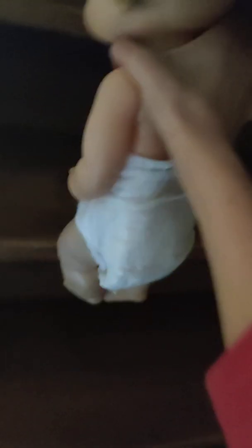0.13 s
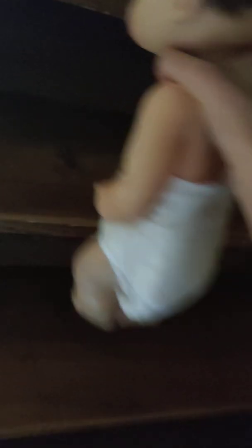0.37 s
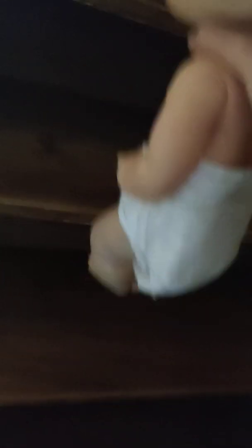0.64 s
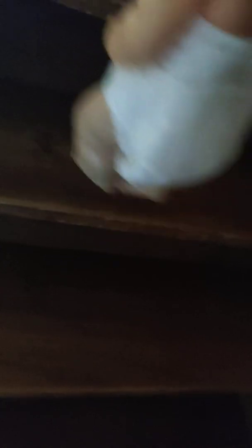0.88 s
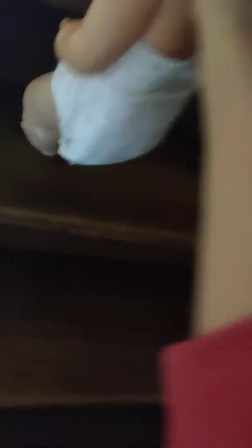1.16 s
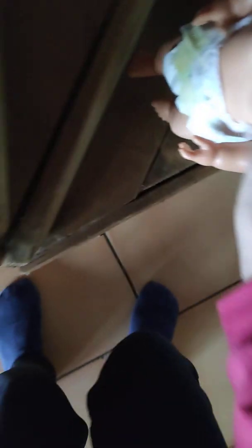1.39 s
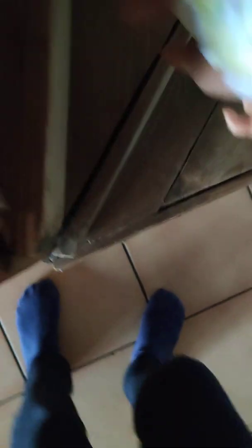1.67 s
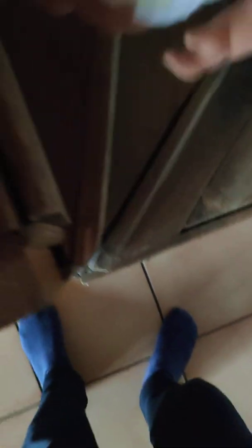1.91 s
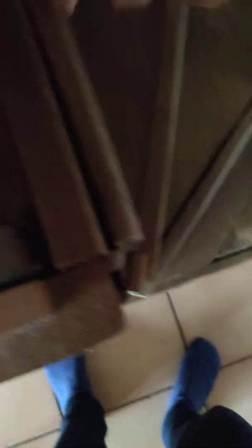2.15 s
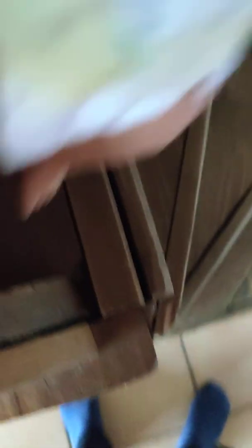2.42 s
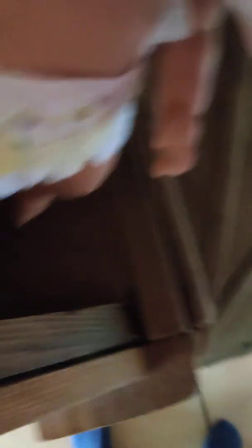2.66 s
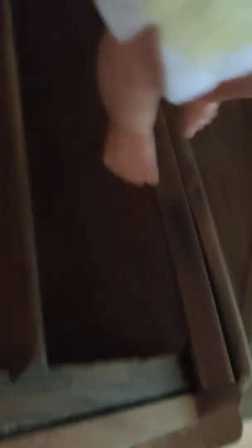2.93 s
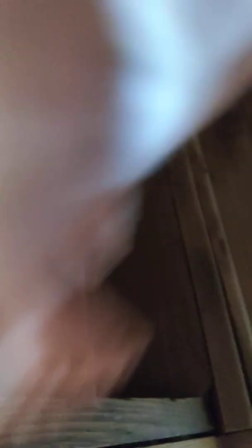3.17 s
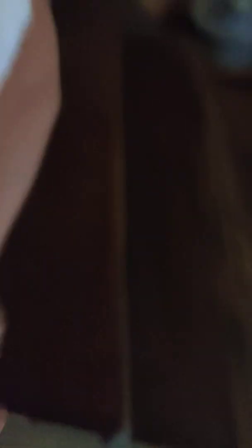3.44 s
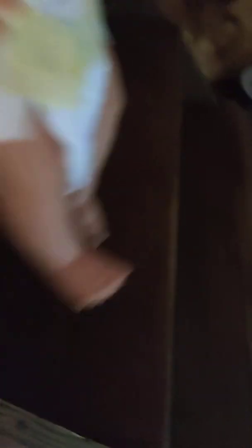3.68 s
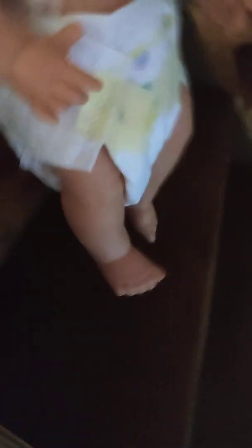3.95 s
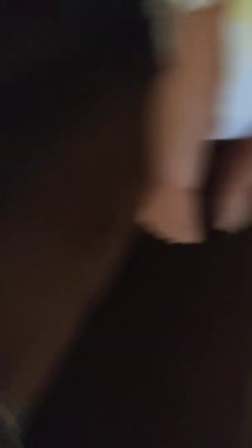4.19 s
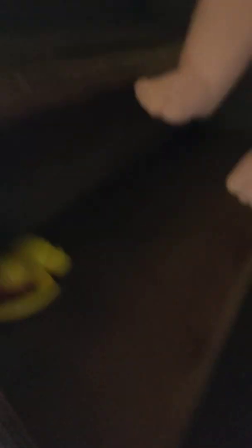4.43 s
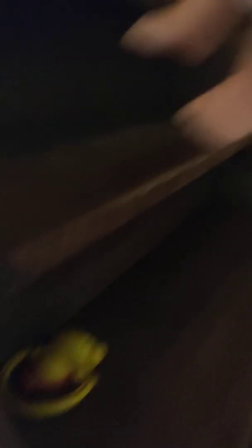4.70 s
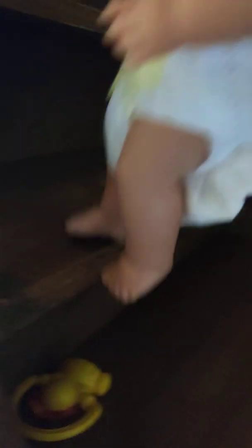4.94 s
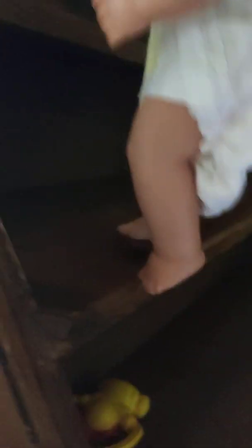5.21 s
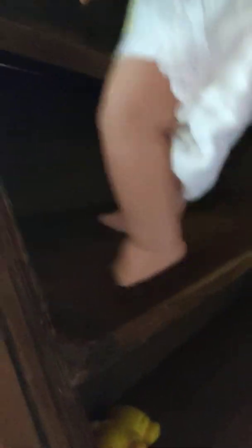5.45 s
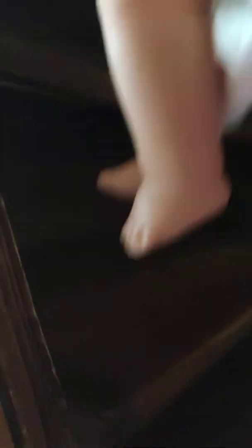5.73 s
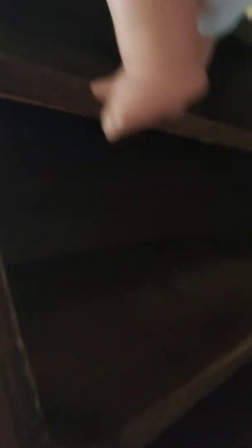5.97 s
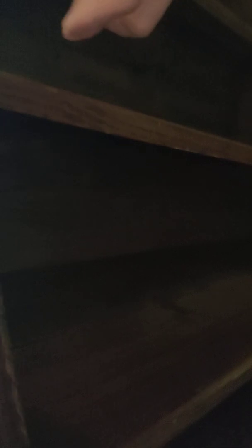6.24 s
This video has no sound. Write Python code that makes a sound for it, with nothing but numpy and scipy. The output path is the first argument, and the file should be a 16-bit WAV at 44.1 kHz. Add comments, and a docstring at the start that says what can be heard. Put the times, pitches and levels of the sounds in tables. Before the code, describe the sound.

A hollow plastic doll is knocked up wooden stairs, single thumps then a rapid clatter, with papery nappy rustles and soft handling rumble.

```python
"""A quiet wooden stairwell, heard close up on a hand-held phone with two microphones.
A hollow plastic doll is hopped up the stairs by hand: single knocks, then a quick run. Each knock rings
the modes of its tread, with a low thump, a noisy slap and a faint stairwell echo. The nappy's rustle and the
sleeve's shuffle are coloured noise, fingers tick as short rings, and the grip rumbles as deep noise.
The sound drops out for a moment at an edit."""
import sys
import numpy as np
from scipy import signal
from scipy.io import wavfile

SR = 44100
rng = np.random.default_rng(int(sys.argv[2]) if len(sys.argv) > 2 else 0)


def makeup_ratio(level_db):
    """Linear amplitude ratio for a level in decibels (20 dB per factor of ten)."""
    decades = np.asarray(level_db, float) / 20
    return 10 ** decades


def put_to_file(sound):
    """Save the sound as 16-bit audio at rate SR, in the file named by the first command-line argument."""
    columns = np.atleast_2d(sound).T  # one column per channel
    safe = np.clip(columns, -1, 1)
    whole_steps = np.round(safe * 32767)
    wavfile.write(sys.argv[1], SR, whole_steps.astype(np.int16))


N = 280154   # samples

# soft, dull noise colour, shared by the sleeve and the blurred staircase: f/Hz, density/dB per Hz
SHUFFLE_SPECTRUM = [(120, -16), (440, -3.5), (835, -8), (2000, -15), (5000, -27)]


def at_hz(points, hz):
    """Read a table on a log-frequency axis."""
    table_hz, values = np.transpose(points)
    return np.interp(np.log(hz), np.log(table_hz), values)


def in_time(rows):
    """Join the rows of a curve by straight lines."""
    return np.interp(np.arange(N) / SR, *np.transpose(rows))


def rms_one(x):
    """Scale to rms 1."""
    return x / np.sqrt(np.mean(x ** 2) + 1e-20)


def white_pairs():
    """Two independent stereo pairs of white noise."""
    return rng.standard_normal((2, 2, N))


def drift(rate_hz):
    """Random curve of rms 1: noise at every 40th sample, smoothed by two equal poles at rate_hz."""
    pole = np.exp(-2 * np.pi * rate_hz * 40 / SR)
    noise = rng.standard_normal(N // 40 + 2002)
    slow = signal.lfilter([1], [1, -2 * pole, pole ** 2], noise)[2000:]   # drop the run-in
    return np.interp(np.arange(N) / 40, np.arange(len(slow)), rms_one(slow))


def ring(clicks, hz, t60):
    """A damped resonator: a unit click sets off a sine of about height 1 that falls 60 dB in t60 seconds."""
    pole, turn = makeup_ratio(-60 / (t60 * SR)), 2 * np.pi * hz / SR
    return signal.lfilter([0, np.sin(turn)], [1, -2 * pole * np.cos(turn), pole ** 2], clicks + 1e-18)


def strikes(at, sizes, t60):
    """An envelope that jumps at each instant and falls 60 dB in t60 seconds."""
    jumps = np.zeros(N)
    jumps[at] = sizes
    return signal.lfilter([1], [1, -makeup_ratio(-60 / (t60 * SR))], jumps + 1e-18)


def coloured(spectrum, white, patchy_db):
    """Roughly third-octave bands of stereo noise with their own level, flicker and likeness; rms 1."""
    # how alike the two microphones hear each band: f/Hz, left-right correlation
    likeness = [(60, 0.046), (290, 0.9), (640, 0.4), (1400, 0.014), (9000, .01)]
    lowest, highest = spectrum[0][0], spectrum[-1][0]
    edges = np.geomspace(lowest, highest, int(3 * np.log2(highest / lowest)) + 2)
    out = 0
    for k, (low, high) in enumerate(zip(edges, edges[1:])):
        band = signal.butter(2, [low, high], "band", fs=SR, output="sos")
        mid, side = signal.sosfilt(band, white[k % 2])   # neighbouring bands use different noise
        hz = np.sqrt(low * high)
        alike = np.clip(at_hz(likeness, hz), -1, 1)
        gain = makeup_ratio(at_hz(spectrum, hz) + patchy_db * drift(29.0))
        out = out + gain * (np.sqrt(1 + alike) * mid + np.sqrt(1 - alike) * side * [[1], [-1]])
    return rms_one(out)


def still_air():
    """The quiet of the stairwell: steady coloured noise whose bands flicker."""
    # f/Hz, density/dB per Hz
    air_spectrum = [(60, -10.5), (160, -5.5), (500, -3), (1300, -18.5), (2500, -12.5), (4200, -16.5),
                    (7400, -16.5), (8600, -32.5), (15700, -22.5)]
    return makeup_ratio(-63) * coloured(air_spectrum, white_pairs(), patchy_db=5.0)


def stairwell(x):
    """Reverberation: six feedback delays a side, duller on every round, stepped block by block."""
    t60_s, wall_cut_hz, level_db = 0.5, 6800, -23   # t60 of the bass; the treble dies sooner
    dull = np.exp(-2 * np.pi * wall_cut_hz / SR)
    out = np.zeros((2, N))
    lags = (np.geomspace(.009, .037, 12) * SR).astype(int)
    for k, lag in enumerate(lags):
        loop, state = x.copy(), [0.]
        gain = makeup_ratio(-60 * lag / SR / t60_s)
        for i in range(lag, N, lag):
            back, state = signal.lfilter([gain * (1 - dull)], [1, -dull], loop[i - lag:i], zi=state)
            loop[i:i + lag] += back[:N - i]
        out[k % 2] += (loop - x) * (-1) ** (k // 2)   # echoes alone, without the direct sound
    return makeup_ratio(level_db) * out


def handling():
    """A soft sleeve as coloured noise, and the grip's lumpy bass, partly common to both microphones."""
    # sleeve shuffle: t/s, level/dB
    sleeve_level = [(0, -46), (.3, -64), (.44, -57.5), (.55, -76), (1.05, -69.5), (1.242, -58),
                    (1.43, -71.5), (2.0, -57.5), (2.75, -62), (2.95, -54), (3.8, -67.5), (4.418, -43.5),
                    (4.68, -59), (4.952, -51), (5.948, -71), (6.06, -56), (6.35, -85)]
    # grip rumble, before a slight random waver and a lean to the left: t/s, level/dB
    grip_level = [(0, -62.5), (.14, -50.5), (.6, -67), (1.0, -64.5), (1.45, -49), (1.62, -66), (2.1, -60),
                  (2.75, -60), (2.98, -43), (3.15, -63), (3.42, -56), (3.55, -62), (3.9, -67.5),
                  (4.4, -51.5), (4.7, -63), (5.05, -64), (5.15, -50), (5.4, -61.5)]
    shuffle = makeup_ratio(in_time(sleeve_level)) * coloured(SHUFFLE_SPECTRUM, white_pairs(), patchy_db=1.2)
    deep = signal.butter(2, [22, 75], "band", fs=SR, output="sos")
    bass = signal.sosfilt(deep, rng.standard_normal((3, N)))
    rumble = rms_one(bass[:2] + 0.45 * bass[2]) * makeup_ratio([[2.5], [-2.5]])
    return shuffle + makeup_ratio(in_time(grip_level) + 0.8 * drift(3.8)) * rumble


def nappy():
    """A papery swish that starts suddenly at each crease and thins out in uneven scuffs."""
    # sudden creases: t/s, level of the grain peaks/dB
    creases = [(1.2511, -48.5), (2.0626, -41.5), (2.1261, -42.5), (2.2815, -47), (2.361, -47),
               (2.6085, -43), (3.0454, -46.5), (3.6489, -51), (4.1889, -25.5), (4.2474, -33),
               (4.4144, -32.5), (4.7246, -49.5)]
    # papery colour: f/Hz, density/dB per Hz
    paper_spectrum = [(2000, -15.5), (3300, -4.5), (5000, -6.5), (6500, 3.5), (8000, -1), (9000, -5),
                      (13000, -3), (16300, -11)]
    grain_crest_db = 12   # grain peaks above their rms
    s, peak_db = np.transpose(creases)
    at, sizes = np.round(s * SR).astype(int), makeup_ratio(peak_db - grain_crest_db)
    # a quick crease, then the paper settles
    bursts = strikes(at, sizes, t60=0.29) + 0.49 * strikes(at, sizes, t60=1)
    grains = white_pairs() * makeup_ratio(3 * drift(50.0) + 2 * drift(400.0))
    return bursts * coloured(paper_spectrum, grains, patchy_db=-1.0)


def ticks():
    """Fingers and creases near the phone: a snap plus brief crackle, ringing shortly at its pitch."""
    # t/s, peak averaged over the sides/dB, pitch f/Hz, left over right/dB, crackle t60/s
    snaps = [(1.065, -39.5, 1690, 8.5, 0.013), (1.436, -37, 4600, 10, 0.0074),
             (3.001, -35.5, 2300, 3, .012), (3.093, -37.5, 127, 8, 0.0065),
             (3.3469, 1.5, 3970, -40, 0.0041), (3.352, -22, 4900, -10, 0.0068),
             (3.3683, -29.5, 1000, -17, 0.0016), (3.4036, -10.5, 1800, -27, 0.001),
             (3.408, -34.5, 141, -10, 0.025), (3.817, -45.5, 2280, 2, .015),
             (4.394, -24.5, 7630, 15, 0.011), (4.824, -37, 131, 20.5, 0.009), (5.319, -42, 1430, 23, 0.004),
             (5.467, -42.5, 4200, 9, 0.021), (5.5634, -28, 2600, -19, 0.006), (5.788, -43, 3600, -35, 0.11)]
    touch_db = -23   # louder ticks touch the phone and keep their bass
    out, t = np.zeros((2, N + 2000)), np.arange(2000) / SR
    for s, peak_db, hz, pan_db, crackle_s in snaps:
        crackle = rng.standard_normal(len(t)) * makeup_ratio(-60 * t / max(crackle_s, .001))
        push = (t == 0) + 0.2 * crackle
        tick = ring(push, hz, 1.5 / hz) + .3 * push
        order, cut_hz = (1, hz / 5) if peak_db > touch_db else (3, hz / 2.2)
        tick = signal.lfilter(*signal.butter(order, cut_hz, "high", fs=SR), tick)
        sides = makeup_ratio([[min(pan_db, 0)], [min(-pan_db, 0)]])   # only the far microphone is turned down
        start = round(s * SR)
        out[:, start:start + len(t)] += makeup_ratio(peak_db) * 2 * sides / sides.sum() * tick / np.abs(tick).max()
    return out[:, :N]


def knocks():
    """Each landing rings the modes of its tread, thumps the stair frame and slaps out a bright burst."""
    # feet on the treads: t/s, ring level before tilt and chance/dB, tilt of the modes/dB per octave,
    # slap level before panning/dB, snap (above 0 a hard start, below 0 a swell)
    landings = [(0.001, -23, 13, -47, 2), (0.121, -19, 3, -42, 3.2), (0.194, -28, 7, -79, 3),
                (0.313, -46.5, -1, -76, -2), (1.563, -19.5, -5.5, -49, -0.64),
                (2.0422, -15.5, 3.5, -38.5, 1.44), (2.0494, -7, -1.5, -43.5, 0.73),
                (2.372, -38.5, -5.5, -54, 2), (2.9162, -3.5, 3.5, -25, 0.3), (3.964, -12, 12, -15.5, 4),
                (3.976, -15.5, -17.5, -24.5, 0.5), (4.045, -6.5, -4.5, -13, 1.1),
                (4.1126, -6.5, 1, -21.5, 1.1), (4.1215, -21.5, -5.5, -11.5, -6.9),
                (4.1975, -8, 9, -21, -1.3), (4.219, -5, 2.5, -38.5, 0.5), (4.337, -13.5, 4.5, -32, 1.9),
                (4.36, -11.5, -1.5, -39.5, 1.6), (5.11, -11, 8.5, -41, 0), (5.121, -29, 8.5, -39, 11),
                (5.163, -22, 13, -57, 0.43)]
    # each tread with the hollow doll on it: lag of the left microphone/ms, low thump/dB,
    # modes (f/Hz, relative level/dB, t60/s)
    treads = [ (0.065, -13, [(155.6, 1, 0.31), (261.7, -4, 0.34), (436, -20, 0.3), (746, -36, 0.065),
              (870, -31.5, 0.14), (1390, -38, 0.047)]), (0.3, -24.5, [(385, -1, 0.073), (495, -2, 0.027),
              (594.4, -15, 0.24), (756, -3, 0.091), (1120, -33, 0.04), (1867, -4.5, 0.098)]),
              (0.23, -35.5, [(431.7, -6, 0.058), (498, -4, 0.067), (556, -22, 0.45), (626.5, -8, 0.032),
              (1175, -27, 0.48), (1038, -3.5, 0.0053), (1297, -7, 0.014), (1950, -15.5, 0.01)]),
              (0.24, -20, [(213.6, -15.5, 0.17), (277.3, -8.5, 0.2), (422.7, -4.5, 0.13), (467, -5.5, 0.22),
              (900, -4, 0.026), (837, -10, 0.16), (1180, -3.5, 0.0049), (1410, -10.5, 0.03),
              (1774, -13.5, 0.035), (2600, -20, 0.024)]), (0.26, -58.5, [(301.7, -10, 0.16),
              (414.3, -5, 0.075), (445.4, 3, 0.12), (488, -1.5, 0.13), (580, -9, 0.098), (690, -13.5, 0.1),
              (832, -13.5, 0.14), (924, -21, 0.33), (1084, -17, 0.04), (1260, -18.5, 0.038),
              (1677, -28, 0.082)]), (.03, 3.5, [(132.6, 1.5, 0.19), (163, 4, 0.13), (252, -4, 0.19),
              (308.6, -4, 0.27), (381.2, -7.5, 0.23), (438, 1, 0.038), (517, -5, 0.077), (870, -23, 0.047),
              (1375, -29, 0.013)])]
    # when the doll moves to the next tread: t/s
    next_tread = [1.0, 1.8, 2.6, 3.5, 4.8]
    # bright burst of the slap: f/Hz, density/dB per Hz
    slap_spectrum = [(900, 21), (2400, 11), (3700, 4), (7700, 10.5), (9500, 2), (15900, -1)]
    rows = np.array(landings)
    tread_of = np.searchsorted(next_tread, rows[:, 0])
    luck_db = rng.normal(0, 1.0, (len(rows), 16))
    # loose limbs keep chattering on the wood after the first contact, heard differently by each microphone
    chatter, fade = makeup_ratio(-31.5) * rng.standard_normal((2, N)), makeup_ratio(-60 / (.1 * SR))
    # a slow random waver in level keeps the rings from sounding too pure
    wavers = [makeup_ratio(3 * drift(28.0)) for _ in range(5)]
    # a high-pass keeps the sudden starts of the summed rings from adding bass
    bass_cut = signal.butter(2, 140, "high", fs=SR)
    out = np.zeros((2, N))
    for tread, (lag_ms, thump_db, modes) in enumerate(treads):
        here = tread_of == tread
        s, level_db, tilt_db, _, snap = rows[here].T
        right = np.round(s * SR).astype(int)
        left = right + round(lag_ms * SR / 1000)
        start = np.zeros((2, N))
        start[0, left], start[1, right] = snap, snap
        for k, (hz, mode_db, t60) in enumerate(modes + [(39.7, thump_db, 0.086)]):   # the thump comes last
            octave = np.log2(hz / 450)
            size = makeup_ratio(level_db + mode_db + tilt_db * np.clip(octave, -1.6, 2.1) + luck_db[here, k])
            pan_db = 1.5 - 1.6 * np.tanh(1.5 * (octave - .4))   # deep modes lean left, high ones sit central
            clicks = np.zeros((2, N))
            clicks[0, left], clicks[1, right] = size * makeup_ratio(pan_db / 2), size * makeup_ratio(-pan_db / 2)
            contact = clicks + chatter * signal.lfilter([1], [1, -fade], clicks + 1e-18)
            body = 0.52 * wavers[k % len(wavers)] * ring(contact, hz, t60)
            # a short ring on top sharpens a hard heel; of opposite sign it lets a flat sole swing the wood up
            sound = body + 0.51 * ring(clicks * start, hz, 0.026)
            if k < len(modes):
                sound = signal.lfilter(*bass_cut, sound)
            out += (-1) ** k * sound
    at, slaps = np.round(rows[:, 0] * SR).astype(int), makeup_ratio(rows[:, 3])
    burst = strikes(at, slaps, 0.044) + 0.084 * strikes(at, slaps, 0.58)
    rattle = white_pairs() * makeup_ratio(2.3 * drift(120.0))   # loose joints make the burst grainy
    slap = burst * makeup_ratio([[-2.0], [2.0]]) * coloured(slap_spectrum, rattle, patchy_db=6.0)
    # the many weak modes of the whole staircase blur into a woody noise
    blur = strikes(at, makeup_ratio(rows[:, 1] - 26.5), 0.34)
    frame = blur * coloured(SHUFFLE_SPECTRUM, white_pairs(), patchy_db=1.5)
    return out + slap + frame


def scene():
    """Knocks in the stairwell over handling noise and still air."""
    hits = knocks()
    echoes = stairwell(hits.mean(axis=0))
    return still_air() + echoes + handling() + nappy() + ticks() + hits


def top_cut(x):
    """Nothing passes above the cut-off."""
    return signal.sosfilt(signal.butter(12, 16980, fs=SR, output="sos"), x)


def record(dry):
    """Peaks are rounded; an edit leaves a short silence."""
    # the silence: start t/s, end t/s
    dropout = (1.0775, 1.1945)
    t = np.arange(N) / SR
    playing = (t < dropout[0]) | (t > dropout[1])
    mix = np.tanh(dry) * playing
    return top_cut(mix)


dry = scene()
out = record(dry)
put_to_file(out)
```